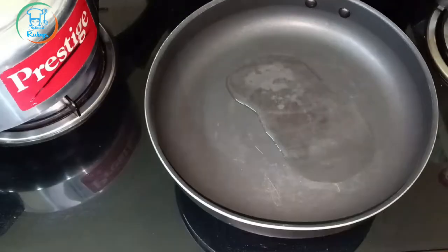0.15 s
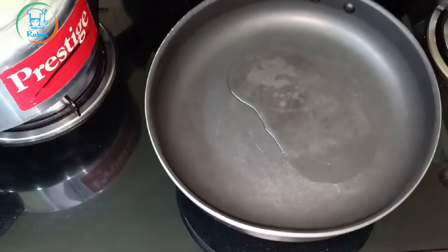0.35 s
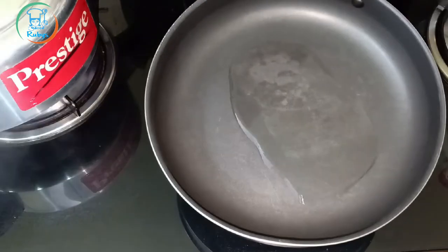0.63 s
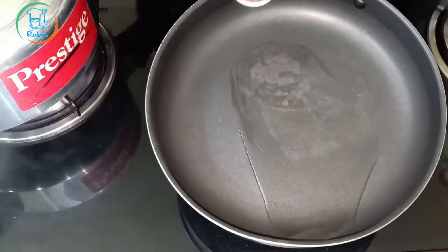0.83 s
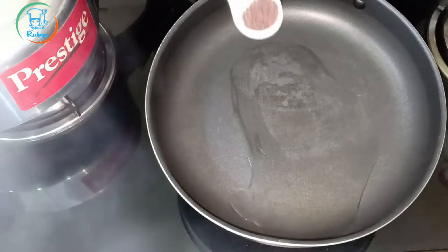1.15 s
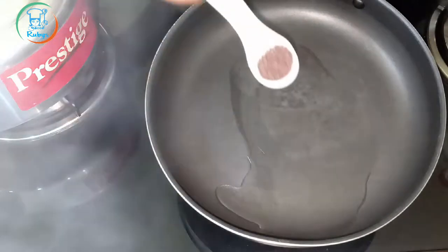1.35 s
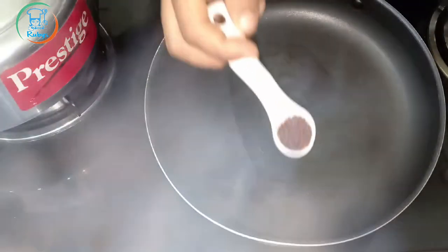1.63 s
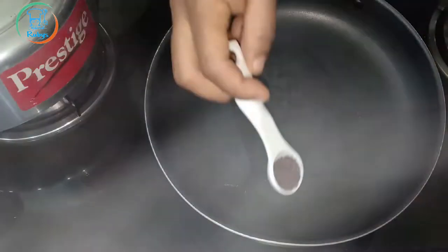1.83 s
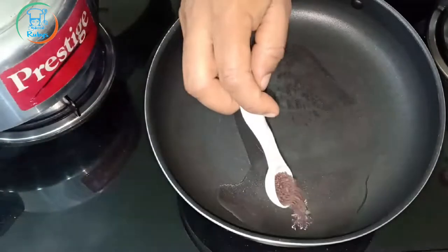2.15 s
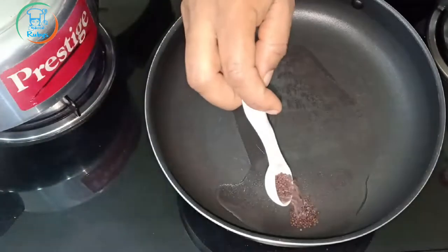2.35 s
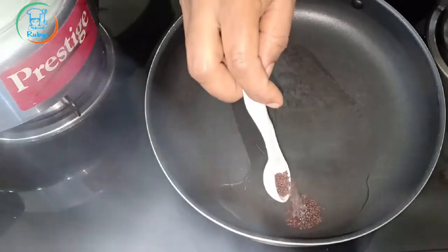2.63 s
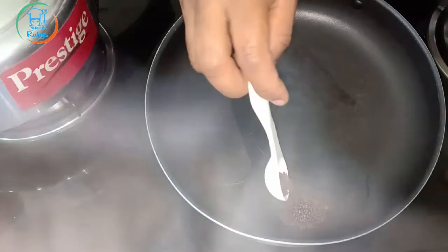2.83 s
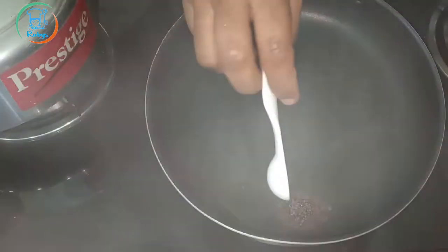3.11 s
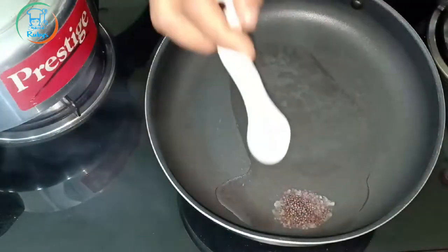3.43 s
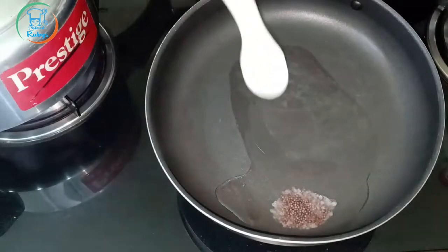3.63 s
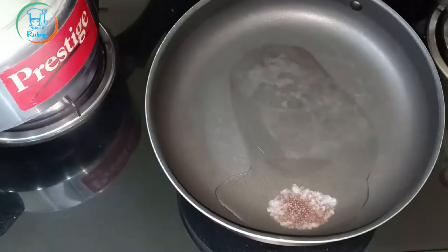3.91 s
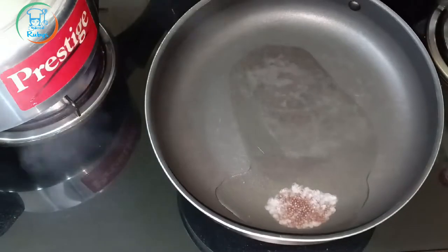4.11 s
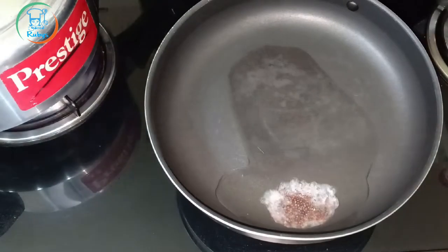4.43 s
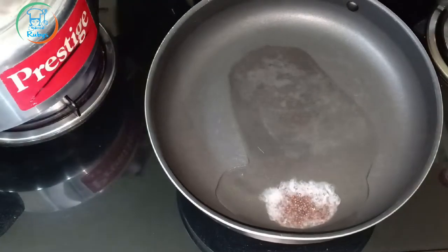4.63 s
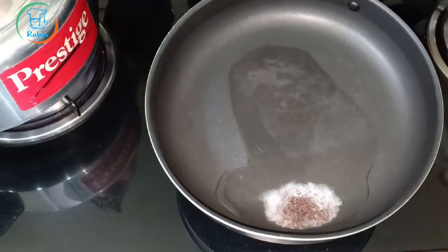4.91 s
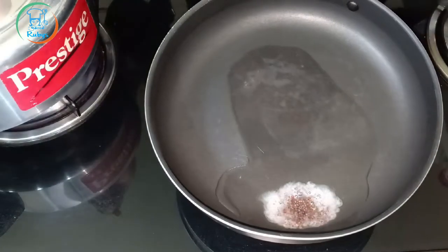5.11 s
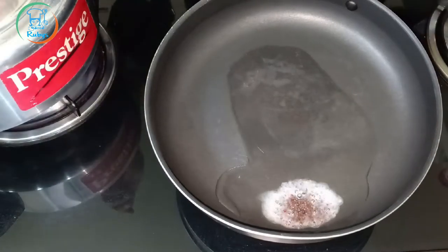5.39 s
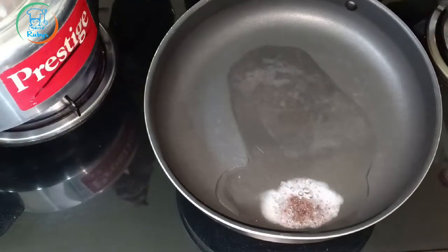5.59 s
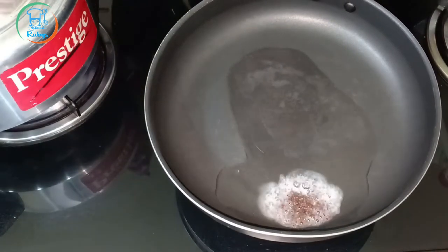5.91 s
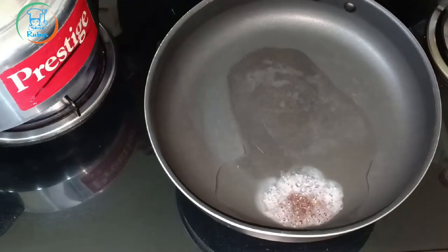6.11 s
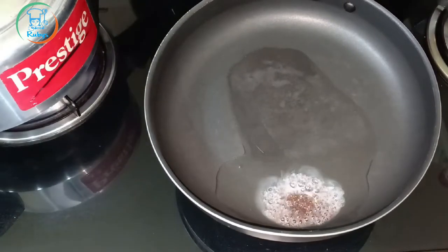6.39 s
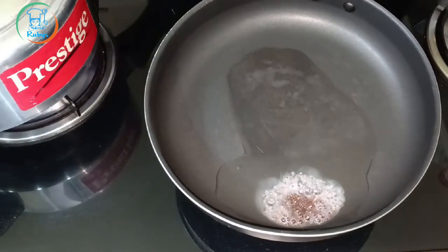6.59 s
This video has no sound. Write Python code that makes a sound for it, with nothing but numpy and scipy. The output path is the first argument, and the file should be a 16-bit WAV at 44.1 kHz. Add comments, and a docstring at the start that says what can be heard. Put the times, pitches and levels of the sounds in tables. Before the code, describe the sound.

A very quiet kitchen with a thin oil sizzle and faint stove hum. A small metal weight knocks, and at once a pressure cooker blasts steam, a harsh bright hiss with a piercing noisy shriek, swelling and wavering for about four and a half seconds. Droplets pop softly against the close stereo microphones. The jet cuts off abruptly with two faint, falling whistles, leaving sizzle and a slight seep.

```python
"""A thin, even sizzle, a seeping valve and a faint hum come first; then a pressure cooker's weight knocks, lifts
and vents for about 4.5 s. The hiss is shaped turbulent noise; two cavity resonances add a shriek at 5-6.5 kHz.
Droplets from the steam plume land on the two microphone ports as soft pressure pops.
Random bubble bursts join the sizzle when the seeds go in at 2.2 s. The weight drops back with two faint
whistles and leaves sizzle, hum and a slowly growing seep."""
import sys
import numpy as np
from scipy import signal
from scipy.fft import rfft, irfft, next_fast_len
from scipy.io import wavfile
from scipy.ndimage import uniform_filter1d, map_coordinates

SR = 44100
rng = np.random.default_rng(int(sys.argv[2]) if len(sys.argv) > 2 else 0)


def master_out(mix):
    """Clip the mix to full scale and print it as 16-bit PCM to the path in sys.argv[1]."""
    frames = np.transpose(np.atleast_2d(mix))
    ceiling = np.clip(frames, -1, 1)
    pcm = np.round(ceiling * 32767).astype(np.int16)
    wavfile.write(sys.argv[1], SR, pcm)


N = 297675  # samples

# knock of the weight on its seat: t/s, reference level/dB (ring and crack are set relative to it)
KNOCK_EVENTS = [(0.212, -25.5)]

# Valve motion
OPEN_S, ATTACK_S = 0.39, 0.014  # the weight lifts clear; time scale of the lift
LEAK_DB, LEAK_WIDENS_DB_PER_S = -23, 84.5  # gap just before the lift, re open valve; its growth after the knock
CLOSE_S, DROP_DB_PER_S = 4.915, 297  # the weight drops back; how fast that chokes the jet
LINGER_DB, LINGER_DB_PER_S = -6, 103  # gap left after the drop; how fast it narrows
# the seated valve seeps: at full pressure, just after venting, and its rise as pressure returns
SEEP_DB, SHUT_DB, RECOVER_DB_PER_S = -37.5, -55.5, 4

# Jet
HISS_REFERENCE_DB, SAG_DB_PER_S = -27.2, 1.11  # before each layer's own gain; fall as the cooker empties
HISS_GROWS, HISS_FOLLOWS = 1.126, 0.45  # hiss dB per dB of opening; per dB of the shriek's swells
LOWER_DB, LOWER_GAINS_DB_PER_S = -2.5, 0.2  # lower resonance re upper, before layer gains; rise during venting

# Mist, pan and propagation
MIST_DB, MIST_SWING_DB = -49.5, 2.1  # rms before the opening's envelope; scale of the plume's wandering
MIST_ARRIVES_S, MIST_RISE_S = 0.31, 0.05  # the plume reaches the ports; how quickly it thickens
SIMMER_DB, BUBBLES_DB = -68.5, -11.5  # rms of the pan's hiss; bubbles relative to it
PORT_LAG = 12.3  # samples by which the left port hears the cooker later
TOP_HZ, TOP_EDGE_HZ = 15570, 150  # centre and width of the upper band edge


def amp(db):
    """Logarithmic level: decibels to amplitude gain."""
    return 10 ** (np.asarray(db) / 20)


def unit(x):
    """Power normalisation: scale to rms 1."""
    return x / np.sqrt(np.mean(x ** 2) + 1e-20)


def along(points, hz):
    """Interpolation on a log-frequency axis through (f/Hz, value) points."""
    f, v = np.transpose(points)
    return np.interp(np.log(hz + 1), np.log(f + 1), v)


def wobble(rate):
    """Slow random modulation: a smooth curve through random knots, rate of them a second."""
    knots = rng.standard_normal(int(N * rate / SR) + 4)
    return map_coordinates(knots, [np.arange(N) * rate / SR])


def filtered(x, response):
    """Linear filtering: the spectrum of x times a complex response of frequency."""
    m = next_fast_len(N + SR // 2)
    return irfft(rfft(x, m) * response(np.fft.rfftfreq(m, 1 / SR)), m)[..., :N]


def coloured(x, spectrum):
    """Spectral shaping: x filtered by a response through (f/Hz, level/dB) points."""
    return filtered(x, lambda hz: amp(along(spectrum, hz)))


def simmer():
    """Superposed random bursts: tiny bubbles round the seeds over an even hiss, with the stove's wavering hum."""
    # spectrum of the sizzle: f/Hz, relative spectral level/dB
    sizzle_spectrum = [(35, -37.5), (60, -22), (91, -9.5), (150, -16.5), (260, -17), (520, -17.5),
                       (950, -16), (1200, -23), (1800, -14), (2450, -9), (3700, -19.5), (5200, -16.5),
                       (5900, -8), (6800, -18), (8800, -22.5), (15500, -26.5)]
    # partials of the stove's hum: f/Hz, mean level/dB
    hum_partials = [(194, -88), (932, -96.5)]
    now = np.arange(N) / SR
    hiss = unit(coloured(rng.standard_normal((2, N)), sizzle_spectrum))
    burst_times = rng.random(N) < 2500 / SR  # mean bursts per second
    bursts = burst_times * rng.standard_normal((2, N)) * (now > 2.2)  # from when the seeds go in
    bubbles = unit(coloured(bursts, sizzle_spectrum))
    hum = 0
    for hz, db in hum_partials:
        phase = 2 * np.pi * hz * now + 1.1 * wobble(14)
        hum = hum + amp(db + 3 * wobble(12)) * np.sin(phase)
    return amp(SIMMER_DB) * (hiss + amp(BUBBLES_DB) * bubbles) + hum


def opening():
    """Flow through a variable gap (open = about 1): seeps, leaks after the knock, lifts, holds, drops, settles."""
    now = np.arange(N) / SR
    closing_s = np.maximum(now - CLOSE_S, 0)
    lift = .5 + .5 * np.tanh((now - OPEN_S) / (2 * ATTACK_S))
    leak_db = LEAK_DB - LEAK_WIDENS_DB_PER_S * np.maximum(OPEN_S - now, 0)
    leak = amp(leak_db) * (now > KNOCK_EVENTS[0][0])
    drop = amp(-DROP_DB_PER_S * closing_s)
    linger = amp(LINGER_DB - LINGER_DB_PER_S * closing_s)
    release = np.maximum(drop, linger)
    seep = amp(np.where(now < CLOSE_S, SEEP_DB, SHUT_DB + RECOVER_DB_PER_S * closing_s))
    return np.hypot(np.maximum(lift, leak) * release, seep)


def rush(spectrum, patchy_db):
    """Turbulent noise: a coloured random spectrum of rms 1 with drifting patches of gain."""
    z = signal.stft(rng.standard_normal(N), nperseg=1024)[2]
    field = uniform_filter1d(rng.standard_normal(z.shape), size=3, axis=0)  # smooth over frequency
    field = uniform_filter1d(field, size=9, axis=1)  # smooth over time
    noise = signal.istft(z * amp(patchy_db * unit(field)), nperseg=1024)[1][:N]
    return unit(coloured(noise, spectrum))


def kitchen(x, early_db, tail_db):
    """Delay and reverberation: the right port hears first, hob and walls answer; nominal power is kept."""
    # decay of the room's tail: f/Hz, t60/s
    room_decay = [(200, 0.18), (2000, 0.58), (6000, 0.29), (14000, 0.15)]
    hz, t, z = signal.stft(rng.standard_normal((2, SR // 2)), SR, nperseg=256)
    tail = signal.istft(z * amp(-60 * t / along(room_decay, hz)[:, None]), SR, nperseg=256)[1]
    early_decay = amp(-60 * np.arange(tail.shape[1]) / SR / 0.11)  # t60 0.11 s
    early = rng.standard_normal(tail.shape) * early_decay
    walls = amp(tail_db) * tail / np.linalg.norm(tail[0])
    walls = walls + amp(early_db) * early / np.linalg.norm(early[0])
    delayed = np.pad(x, (SR // 500, 0))[None]  # reflections start after 2 ms
    echo = signal.fftconvolve(delayed, walls, axes=1)[:, :N]
    direct = filtered(x, lambda f: np.exp(np.outer([-1, 1], 1j * np.pi * f * PORT_LAG / SR)))
    return (direct + echo) / np.sqrt(1 + amp(early_db) ** 2 + amp(tail_db) ** 2)


def plume(spectrum, level, patchy_db, swirl_db, early_db, tail_db):
    """Partial coherence: jet noise by fixed paths, plus part by paths that the swirling steam keeps changing."""
    steady = kitchen(level * rush(spectrum, patchy_db), early_db, tail_db)
    swirl = level * np.array([rush(spectrum, patchy_db), rush(spectrum, patchy_db)])
    return (steady + amp(swirl_db) * swirl) / np.sqrt(1 + amp(swirl_db) ** 2)


def steam():
    """Jet noise and cavity resonance: steam hisses under the rocking weight and sags; the cavity shrieks."""
    # the jet's hiss below and above the shriek, each: f/Hz, relative spectral level/dB
    body_spectrum = [(120, -41.5), (300, -23), (700, -14.5), (1200, -14), (1600, -11.5), (2000, -5),
                     (2400, -0.5), (2750, 1), (3400, -4.5), (4100, -1), (4500, 1), (5800, -28), (9000, -88)]
    fizz_spectrum = [(5000, -40), (7000, 1.5), (7500, -1), (8200, 1.5), (9000, -4), (9700, -4),
                     (10400, -1.5), (10900, -3), (11400, 1.5), (12100, -7.5), (12800, -5), (13600, -5),
                     (14400, -3), (15400, -2.5)]
    # the valve's two cavity resonances, each: f/Hz, relative spectral level/dB
    lower_resonance = [(3300, -35), (4500, -11.5), (5000, -1), (5300, -1), (5550, 0), (5900, -16.5),
                       (7000, -46)]
    upper_resonance = [(4400, -44), (5450, -18.5), (5700, -2), (5920, -1), (6250, -4), (6600, -8.5),
                       (7000, -13.5), (8500, -42.5)]
    # shriek of the open valve: t/s, reference level/dB (before each resonance's own gain)
    shriek_course = [(0.45, -28), (0.59, -25.5), (0.99, -28), (1.01, -23), (1.04, -26.5), (1.8, -27.5),
                     (1.82, -30.5), (2.18, -28), (2.26, -29.5), (2.32, -27.5), (2.75, -24), (2.97, -29.5),
                     (3.36, -26.5), (3.69, -29), (3.86, -27.5), (4.58, -30), (4.69, -27.5), (4.93, -25.5)]
    # directivity between the ports: f/Hz, left minus right level/dB
    port_balance = [(300, 9.5), (800, 2), (1600, 0), (2700, -2), (3400, 0), (4100, -3), (4500, 1),
                    (5200, -5), (6000, 3), (6700, -0.5), (8500, -1), (12500, -1), (14000, 3.5),
                    (15200, -1.5)]
    now, gap = np.arange(N) / SR, opening()
    venting_s = np.maximum(now - OPEN_S, 0)
    shriek_db = np.interp(now, *np.transpose(shriek_course))
    swell_db = shriek_db - np.transpose(shriek_course)[1].mean()
    flow_db = HISS_REFERENCE_DB - SAG_DB_PER_S * venting_s + HISS_FOLLOWS * swell_db
    flow = gap ** HISS_GROWS * amp(flow_db)
    lower_ratio = amp(LOWER_DB + LOWER_GAINS_DB_PER_S * venting_s)
    rocking = amp(0.39 * wobble(24))
    flutter = rocking * amp(0.55 * wobble(35))
    cavity = flutter * gap * amp(shriek_db) / np.sqrt(1 + lower_ratio ** 2)
    body = plume(body_spectrum, amp(1.32) * rocking * flow,
                 patchy_db=1.5, swirl_db=0.5, early_db=-7.0, tail_db=-7.0)
    fizz = plume(fizz_spectrum, amp(4.0) * rocking * flow,
                 patchy_db=3.5, swirl_db=6.0, early_db=-7, tail_db=-9.5)
    lower = plume(lower_resonance, amp(3.0) * cavity * lower_ratio,
                  patchy_db=1.5, swirl_db=-7.5, early_db=1.5, tail_db=4.0)
    upper = plume(upper_resonance, amp(3.5) * cavity,
                  patchy_db=3.0, swirl_db=-3.5, early_db=-4.5, tail_db=4.0)
    jet = body + fizz + lower + upper
    return filtered(jet, lambda hz: amp(np.outer([.5, -.5], along(port_balance, hz))))


def valve():
    """Modal impact: the weight knocks once before it lifts; the small lid radiates almost no bass."""
    # modes of the weight and lid: f/Hz, relative level/dB, t60/s
    lid_modes = [(440, -21, .11), (700, -13, .016), (870, -3, .018), (1080, -6, .016), (1490, -6, .024),
                 (2160, -11, .028), (2460, -9, .028), (3050, -19, .03), (3500, -18, .03), (4480, -16, .018),
                 (5560, -5, .022), (5700, -8, .026)]
    # noise of the contact itself: f/Hz, relative spectral level/dB
    contact_spectrum = [(200, -40), (450, -8), (850, 0), (1600, -1), (3000, -14), (6000, -14), (9000, -40)]
    s, db = KNOCK_EVENTS[0]
    t = np.maximum(np.arange(N) / SR - s - .001, 0)  # sound starts 1 ms after the listed time
    ring = sum(amp(level - 60 * t / t60) * np.sin(2 * np.pi * hz * t) for hz, level, t60 in lid_modes)
    ring = ring * (1 - np.exp(-t / .0006))  # soft onset
    ring = signal.sosfilt(signal.butter(2, 400, "high", fs=SR, output="sos"), ring)
    contact = (t > 0) * amp(-60 * t / .02) * rng.standard_normal(N)  # t60 20 ms
    crack = coloured(contact, contact_spectrum)
    knock = amp(db + 3) * ring / np.abs(ring).max() + amp(db - 2) * crack / np.abs(crack).max()
    return kitchen(knock, early_db=-13, tail_db=-9)


def port_pop(fall_s, soft_hz, cut_hz):
    """Pressure relaxation: a sudden push, peak 1, leaks away; the microphone's bass cut makes it swing back."""
    t = np.arange(SR // 20) / SR
    soften = signal.butter(2, min(soft_hz, SR / 4), fs=SR, output="sos")
    push = signal.sosfilt(soften, np.exp(-t / fall_s))
    pop = signal.sosfilt(signal.butter(3, cut_hz, "high", fs=SR, output="sos"), push)
    return pop / pop.max()


def droplets(splash_s=0.0012):
    """Random impacts: each droplet pops as it spreads on one port only, a few big ones in a patter of mist."""
    # larger droplets: t/s, level/dB (13 dB below the pop's peak), left minus right/dB (sign picks the port)
    big_drops = [(1.009, -34, 10.5), (1.085, -21.5, 31), (1.679, -34.5, 10), (1.695, -33.5, 6),
                 (1.728, -39, 8), (1.777, -40.5, 6), (2.89, -43.5, -5), (3.348, -30, 1), (3.39, -26, -11.5),
                 (3.418, -32.5, -20), (3.628, -20, -33), (3.657, -31.5, -12.0), (3.934, -35.5, -6.0),
                 (4.129, -36, -8), (4.351, -33.5, -7), (4.85, -30, -4), (4.898, -31, -10.0),
                 (4.919, -29, 4)]
    pops = np.zeros((2, N))
    for s, db, pan in big_drops:
        pop = port_pop(fall_s=0.00059, soft_hz=6000 * amp(db) ** 0.21, cut_hz=65)  # harder blows are sharper
        start = round((s + splash_s) * SR)
        pops[int(pan < 0), start:][:len(pop)] += amp(db + 13) * pop
    landings = rng.random((2, N)) < 500 / SR  # mean landings per second on each port
    mist = landings * rng.standard_normal((2, N)) * amp(2.6 * rng.standard_normal((2, N)))
    fine_pop = port_pop(fall_s=0.00022, soft_hz=1200, cut_hz=100)
    patter = signal.fftconvolve(mist, fine_pop[None], axes=1)[:, :N]
    arrived = .5 + .5 * np.tanh((np.arange(N) / SR - MIST_ARRIVES_S) / (2 * MIST_RISE_S))
    density = arrived * opening() ** 2 * amp(MIST_DB + MIST_SWING_DB * wobble(5))
    return pops + density * unit(patter)


def whistles():
    """Jet tones: the last steam whistles faintly, lower each time, with unsteady phase as the weight sinks back."""
    # whistles of the closing valve: centre t/s, f/Hz, level/dB, half length to 1/e/s
    closing_tones = [(4.99, 780, -52.5, .05), (5.16, 683, -61.5, .065)]
    now = np.arange(N) / SR
    tones = 0
    for at, hz, db, half in closing_tones:
        envelope = np.exp(-((now - at) / half) ** 2)
        tones = tones + amp(db) * envelope * np.sin(2 * np.pi * hz * now + 0.73 * wobble(60))
    return kitchen(tones, early_db=-19, tail_db=-10)


def scene():
    """Superposition: the pressures of cooker and pan add at the two ports."""
    return simmer() + steam() + valve() + droplets() + whistles()


def record(dry):
    """Band limitation: a steep linear edge removes everything above the recorder's upper limit."""
    return filtered(dry, lambda hz: np.clip((TOP_HZ - hz) / TOP_EDGE_HZ + .5, 0, 1))


dry = scene()
out = record(dry)
master_out(out)
```